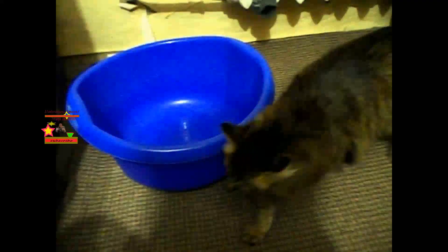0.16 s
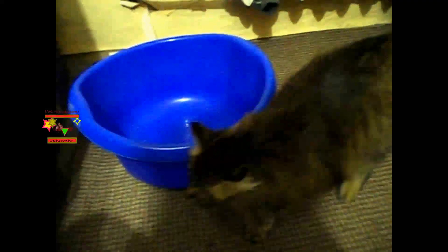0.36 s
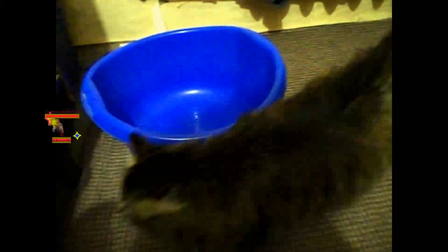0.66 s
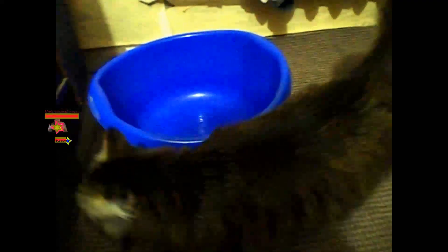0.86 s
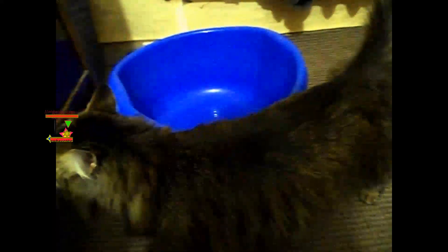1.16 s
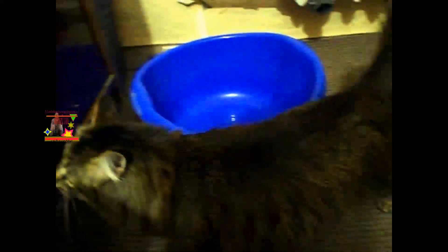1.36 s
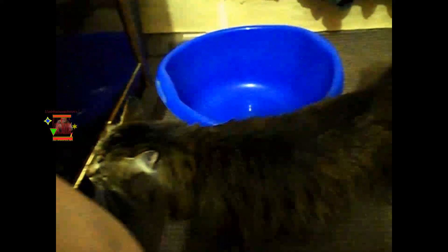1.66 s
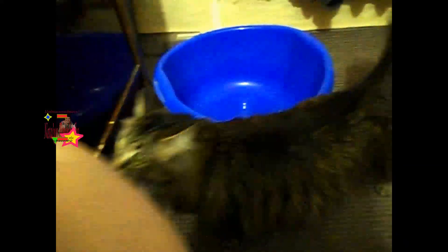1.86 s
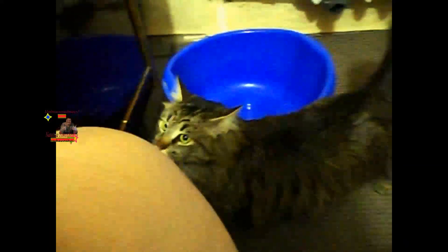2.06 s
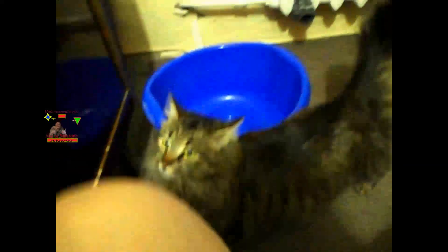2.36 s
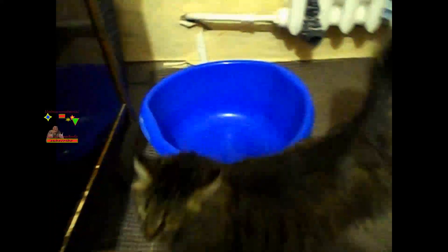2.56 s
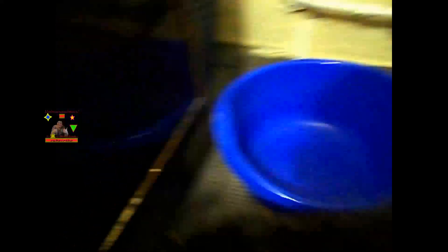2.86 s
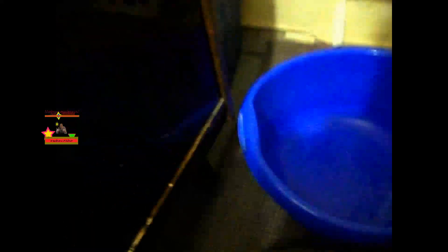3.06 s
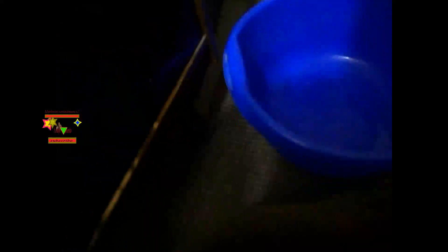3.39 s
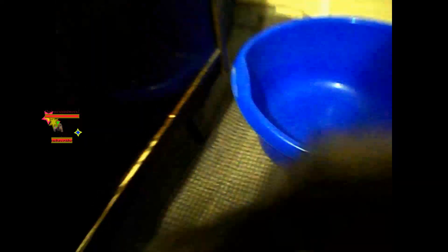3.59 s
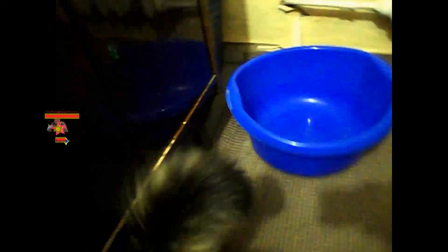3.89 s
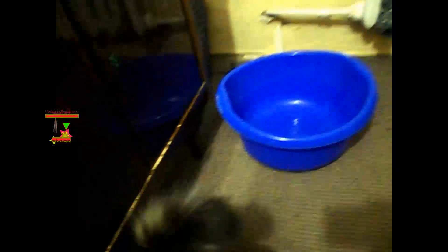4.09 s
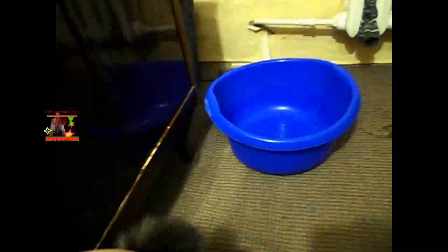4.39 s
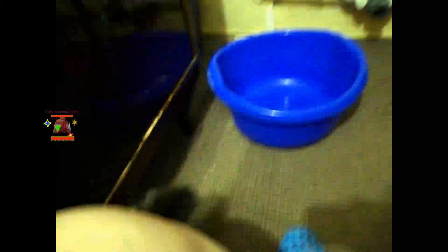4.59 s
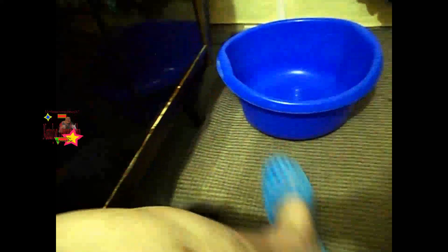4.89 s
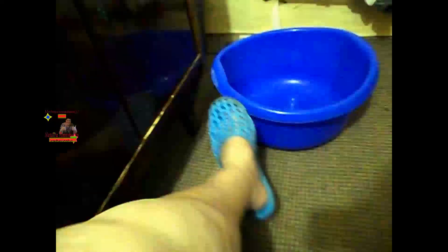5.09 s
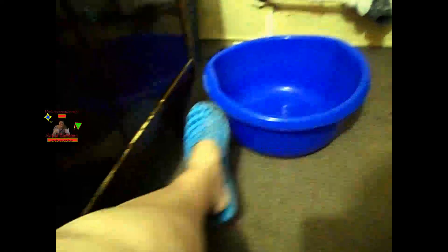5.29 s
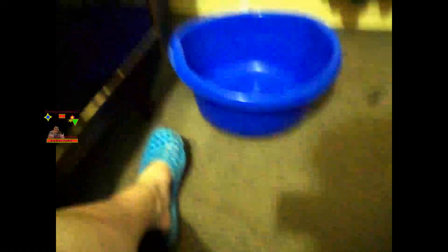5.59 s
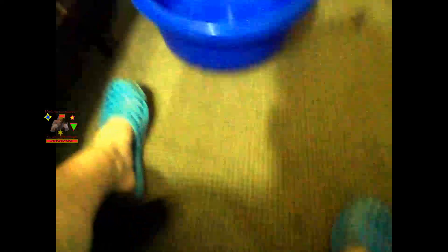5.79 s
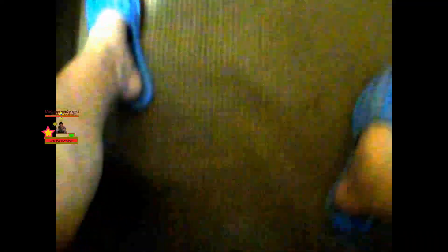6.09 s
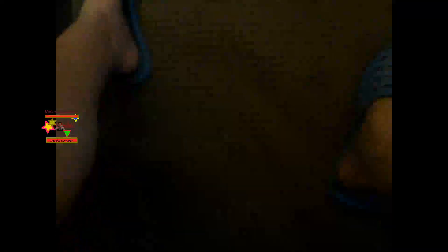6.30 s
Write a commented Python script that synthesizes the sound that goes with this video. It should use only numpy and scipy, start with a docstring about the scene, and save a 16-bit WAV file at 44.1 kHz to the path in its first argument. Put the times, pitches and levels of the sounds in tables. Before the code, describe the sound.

Faint hiss and thin electronic whine, then hand bumps, sharp plastic clicks, one hard knock, and juddering skin scuffs on a small camera case.

```python
"""A steady hiss and a thin electronic whine come first, over the low sway of a hand holding a little camera.
Then the hand shifts its hold: it bumps and brushes the plastic case, and its skin slips and scuffs in judders.
The case snaps in sharp clicks, squeaks briefly under the skin and gives one hard knock.
Hiss, rumble and brushes are coloured noise, the whine is steady tones, slips are rising tones that end in a
tick, and snaps, bumps and the knock are short tones or noise bursts that die away."""
import sys
import numpy as np
from scipy import signal
from scipy.fft import rfft, irfft
from scipy.io import wavfile
from scipy.ndimage import uniform_filter1d

SR = 44100
rng = np.random.default_rng(int(sys.argv[2]) if len(sys.argv) > 2 else 0)


def waveform_to_disk(signal):
    """Save audio, clipped to [-1, 1], as 16-bit WAV at the path in sys.argv[1]."""
    frames = np.transpose(np.atleast_2d(signal))
    scaled = np.clip(frames, -1, 1) * 32767
    samples = np.round(scaled).astype(np.int16)
    wavfile.write(sys.argv[1], SR, samples)


N = 284445
TIME = np.arange(N) / SR


def from_db(db):
    """Turn decibels into a gain."""
    return 10 ** (np.asarray(db) / 20)


def rms_one(x):
    """Scale to unit power."""
    return x / np.sqrt(np.mean(x ** 2) + 1e-20)


def add(out, s, sound):
    """Mix a sound in, starting at s seconds."""
    at = int(np.clip(round(s * SR), 0, N))
    out[at:at + len(sound)] += sound[:N - at]


def level(rows, order, fade_s=0.0115):
    """Gain that follows one dB column of a curve and fades beyond its ends."""
    rows = np.array(rows)
    outside = np.maximum(np.maximum(rows[0, 0] - TIME, TIME - rows[-1, 0]), 0)
    gain = from_db(np.interp(TIME, rows[:, 0], rows[:, order]))
    return gain * np.maximum(1 - outside / fade_s, 0)


def colour(x, points, size=16384):
    """Filter with the given spectrum that never sounds ahead of its input (minimum phase)."""
    hz, db = np.transpose(points)
    bins = np.maximum(np.fft.rfftfreq(size, 1 / SR), 1)
    gain = from_db(np.interp(np.log(bins), np.log(hz), db))
    # folding the cepstrum forward in time gives the minimum phase
    cepstrum = irfft(np.log(gain))
    cepstrum[1:size // 2] *= 2
    cepstrum[size // 2 + 1:] = 0
    response = irfft(np.exp(rfft(cepstrum)))
    return signal.oaconvolve(x, response)[:len(x)]


def noise(points):
    """Coloured noise of unit power."""
    return rms_one(colour(rng.standard_normal(N), points))


def resonate(x, modes):
    """Resonances side by side, each ringing at its own pitch with its own gain."""
    out = 0
    for hz, width, db in modes:
        r = np.exp(-np.pi * width / SR)   # a wider resonance dies away sooner
        zeros = np.array([1, 0, -1]) * (1 - r * r) / 2
        poles = [1, -2 * r * np.cos(2 * np.pi * hz / SR), r * r]
        out = out + from_db(db) * signal.lfilter(zeros, poles, x + 1e-18)
    return out


def with_tail(x, t60, tail_db):
    """Near surfaces add a short diffuse tail, which falls 60 dB in t60 seconds."""
    t = np.arange(SR // 4) / SR
    tail = rng.standard_normal(len(t)) * from_db(-60 * t / t60)
    return x + from_db(tail_db) * signal.oaconvolve(x, tail / np.linalg.norm(tail))[:N]


# The tone of the steady hiss. Each row: frequency in Hz, relative strength in dB.
HISS_COLOUR = [(10, -15), (30, -0.5), (70, -16), (150, -19), (280, -23), (420, -21), (600, -28.5),
               (1200, -30.5), (2000, -34), (4000, -36), (7000, -34.5), (10200, -37.5), (11600, -52),
               (12300, -67.5), (14000, -84)]
HISS_DB = -54.5
# The thin whine of the electronics. Each row: frequency in Hz, level in dB rms.
WHINE_TONES = [(10714, -74.5), (10796, -75.5), (11254, -81), (11336, -80)]
# The tone of the slow hand sway. Each row: frequency in Hz, relative strength in dB.
SWAY_COLOUR = [(3, -8), (9, -3.5), (20, -13), (40, -20), (70, -32), (200, -82.5)]
# How strongly the hand sways. Each row: time in seconds, level in dB before sway_db is added.
SWAY_CURVE = [(0.0, -58), (1.63, -53.5), (1.89, -37.5), (2.51, -55), (2.66, -40), (2.75, -44),
              (3.02, -34.5), (3.57, -46), (3.66, -32), (3.77, -45.5), (5.53, -51.5), (5.64, -42),
              (5.86, -45.5), (6.45, -47)]
# The tone of the grip's rumble. Each row: frequency in Hz, relative strength in dB.
RUMBLE_COLOUR = [(30, -5.5), (55, -3), (85, -2.5), (108, 2), (135, -7.5), (170, -7), (225, -14.5),
                 (320, -12.5), (500, -49.5)]
# How strongly the grip rumbles. Each row: time in seconds, level in dB before rumble_db is added.
RUMBLE_CURVE = [(0.0, -64), (1.72, -61.5), (1.83, -48), (2.08, -60), (2.26, -45.5), (2.33, -61.5),
                (2.43, -40.5), (2.51, -57), (2.89, -43.5), (2.95, -37), (3.56, -53), (3.61, -32.5),
                (3.79, -63.5), (3.83, -39), (3.97, -61), (4.08, -46), (4.63, -62), (4.89, -49), (5.21, -70),
                (5.86, -58), (5.89, -44.5), (6.45, -62)]


def background(sway_db=3.5, rumble_db=-1):
    """Sway and rumble of the hand, steady hiss, and thin whine tones of the electronics."""
    sway = from_db(sway_db) * noise(SWAY_COLOUR) * level(SWAY_CURVE, order=1)
    rumble = from_db(rumble_db) * noise(RUMBLE_COLOUR) * level(RUMBLE_CURVE, order=1)
    whine = np.zeros(N)
    for hz, db in WHINE_TONES:
        turns = hz * TIME + rng.random()
        whine += from_db(db) * np.sqrt(2) * np.sin(2 * np.pi * turns)   # root 2 turns rms into peak
    return sway + rumble + from_db(HISS_DB) * noise(HISS_COLOUR) + whine


# Bumps and brief rubs of the hand.
# Each row: start in seconds, level in dB, centre frequency in Hz, decay time in seconds.
HAND_THUDS = [(.158, -51.5, 704, 0.0097), (.409, -57, 820, .016), (.9, -57.5, 2160, 0.042),
              (1.760, -34, 605, 0.01), (1.845, -27, 42, 0.031), (1.848, -24.5, 705, 0.0062),
              (1.941, -42.5, 665, 0.0177), (2.052, -41, 1010, .008), (2.146, -40.5, 590, 0.044),
              (2.231, -40, 205, 0.0245), (2.402, -29.5, 188, 0.0233), (2.404, -38.5, 740, 0.025),
              (2.766, -37, 2170, .013), (2.892, -35.5, 703, 0.0113), (2.924, -30, 94.1, .046),
              (2.992, -26, 80, .028), (3.06, -36.5, 81, 0.15), (3.602, -30, 81.6, 0.0344),
              (3.703, -40.5, 1380, 0.033), (3.825, -35.5, 130.5, 0.014), (4.031, -37, 149, 0.073),
              (5.553, -43.5, 173.9, .022), (5.678, -31.5, 619, 0.0037), (5.888, -39, 151, 0.04485),
              (6.377, -42, 296, 0.0118)]


def thuds(relative_width=0.7, rise_s=.003):
    """Soft bumps and brief rubs of the hand shake the case in a broad band."""
    out, t = np.zeros(N), np.arange(SR // 3) / SR
    for s, db, hz, decay_s in HAND_THUDS:
        band = [(hz, relative_width * hz, 0)]
        shake = rms_one(resonate(resonate(rng.standard_normal(len(t)), band), band))
        add(out, s, from_db(db) * shake * (1 - np.exp(-t / rise_s)) * np.exp(-t / decay_s))
    return out


# The pressure builds, begins to ease this long before the end, and dies away.
BRUSH_ATTACK_S, BRUSH_RELEASE_S, BRUSH_TAIL_S = .04, 0.014, 0.024


def brush_level(start, length):
    """Pressure of one light brush: it builds evenly, holds, then dies away."""
    pressed = np.clip((TIME - start) / BRUSH_ATTACK_S, 0, 1)
    release = start + length - BRUSH_RELEASE_S
    return pressed * np.exp(-np.maximum(TIME - release, 0) / BRUSH_TAIL_S)


# Light brushes of the skin. Each row: start in seconds, length in seconds, hiss level in dB
# and murmur level in dB, both before brush_db is added.
LIGHT_BRUSHES = [(1.483, 2.6, -59.5, -63), (1.549, 0.053, -56, -58), (1.743, 0.29, -59.5, -58.5),
                 (2.094, 0.1665, -48, -55), (2.36, 0.084, -47, -50.5), (2.444, 0.048, -42.5, -63),
                 (2.545, .16, -46.5, -51), (2.741, 0.0507, -46, -42.5), (2.83, 0.138, -51.5, -49.5),
                 (2.972, 0.3043, -44.5, -43.5), (3.252, .17, -48.5, -48.5), (3.55, 0.12, -54.5, -54),
                 (3.676, 0.072, -44, -40), (3.808, 0.086, -51, -48), (4.43, 0.061, -55, -48.5),
                 (4.515, 0.24, -63, -58), (4.6, 0.068, -57.5, -74), (5.54, 0.15, -59, -63),
                 (5.669, 0.081, -49, -59), (5.755, .11, -45, -51), (6.07, .24, -49.5, -48)]
# The tone of the brushing hiss. Each row: frequency in Hz, relative strength in dB.
BRUSH_COLOUR = [(700, -10), (1200, 0), (2000, -3), (2900, -0.5), (4300, -3.5), (5000, -1), (5600, -2),
                (7000, 2), (9000, -5), (10000, -5), (11000, -20), (12300, -43.5)]
# The dull murmur of the case, also heard in scuffs. Each row: frequency in Hz, relative strength in dB.
BODY_COLOUR = [(120, -13.5), (220, 2.5), (330, 3), (500, -1.5), (800, -3), (1000, -5.5), (1800, -38.5)]
# A short squeak of skin on plastic. Each row: time in seconds, level in dB.
SQUEAK_CURVE = [(2.57, -72), (2.598, -39), (2.624, -40), (2.634, -45.5), (2.684, -43), (2.77, -54.5)]
# What the squeak rings with. Each row: frequency in Hz, width in Hz, gain in dB.
SQUEAK_RINGS = [(987, 29.5, -6.5), (1178, 26, 0), (1250, 82, -17), (1397, 27, -10), (1610, 90, -19)]


def brushes(brush_db=-1, grain_db=2.0):
    """A light touch slides without sticking: a grainy hiss and a dull murmur of the case, plus a squeak."""
    flicker = rms_one(uniform_filter1d(rng.standard_normal(N), size=150))
    grain = rms_one(from_db(grain_db * flicker))
    hiss, body = np.zeros((2, N))
    for start, length, hiss_db, body_db in LIGHT_BRUSHES:
        pressure = brush_level(start, length)
        hiss += from_db(hiss_db) * pressure
        body += from_db(body_db) * pressure
    squeak = rms_one(resonate(rng.standard_normal(N), SQUEAK_RINGS)) * level(SQUEAK_CURVE, order=1)
    return from_db(brush_db) * grain * (hiss * noise(BRUSH_COLOUR) + body * noise(BODY_COLOUR)) + squeak


# A longer slide ends in a harder catch.
CATCH_DB, CATCH_DB_PER_S = -8.5, 1650.5


def slip(slide_s, start_hz=1100, end_hz=7500, zip_db=-1.0, grit_db=-4.5, rough=0.26,
         shove_db=-12, shove_hz=210, catch_s=.0009):
    """Skin lets go and speeds up, so its ridges pass at a rising pitch; then it catches with a tick."""
    t = np.arange(SR // 25) / SR
    slide_s = max(slide_s, .002)
    way = t / slide_s   # 0 at the release, 1 at the catch
    sliding = np.minimum(way, 1)
    catch_db = CATCH_DB + CATCH_DB_PER_S * slide_s
    jitter, grit, tick = rng.standard_normal((3, len(t)))
    pitch = start_hz + (end_hz - start_hz) * sliding ** 1.6
    pitch = pitch * (1 + rough * rms_one(uniform_filter1d(jitter, size=12)))
    swell = np.sqrt(np.maximum(np.sin(np.pi * sliding), 0))
    zipping = np.sin(2 * np.pi * np.cumsum(pitch) / SR) * swell
    grit = grit * np.exp(-((way - .6) / .45) ** 2)   # strongest past the middle of the slide
    tick = np.diff(tick, prepend=0) * np.exp(-np.abs(t - slide_s) / catch_s)
    shove = np.sin(2 * np.pi * shove_hz * t) * np.exp(-way)   # the release jolts the whole case
    skin = from_db(zip_db) * zipping + from_db(grit_db) * grit
    return skin + from_db(catch_db) * tick + from_db(shove_db) * shove


# Level gained from the ends to the hardest moment; time for the skin to bite; time to die away.
SCUFF_SWELL_DB, SCUFF_ATTACK_S, SCUFF_FADE_S = 7, 0.0064, 0.009


def scuff_level(start, hardest, end):
    """The skin bites, pressure builds to the hardest moment, eases and lets go."""
    swell = from_db(np.interp(TIME, [start, hardest, end], [-SCUFF_SWELL_DB, 0, -SCUFF_SWELL_DB]))
    bite = np.clip((TIME - start) / SCUFF_ATTACK_S + 1, 0, 1)   # complete at the start time
    return swell * bite * np.exp(-np.maximum(TIME - end, 0) / SCUFF_FADE_S)


# Every single slip also sounds the hollow of the case, at a level relative to the slip's row.
SLIP_HOLLOW_DB, SLIP_HOLLOW_DECAY_S = -13, .016
# Within runs, faster rubbing shortens each slide and adds smooth hiss: slide time and hiss at the usual rate.
USUAL_SLIPS_PER_S, JUDDER_SLIDE_S, SLIDE_SHORTENS, SLIDING_DB = 99.1, .007, 0.327, -8
# Single slips of the skin, some apart, some close together or at the edge of a run.
# Each row: start in seconds, level in dB before the trims in scuffs(), slide time in seconds.
SINGLE_SLIPS = [(1.585, -33, 0.0089), (1.76, -31, .007), (3.821, -30, 0.0037), (3.985, -39, 0.0097),
                (4.242, -35.5, 0.009), (4.283, -44, 0.013), (4.453, -36, .008), (4.759, -35.5, 0.0087),
                (5.733, -28.5, 0.0094), (5.767, -24.5, 0.0095), (5.793, -26.5, 0.0096), (5.816, -28, .0085),
                (5.886, -28, .0055), (6.123, -29, 0.00443), (6.139, -29, 0.0057), (6.186, -29.5, .005),
                (6.211, -26, 0.0053), (6.238, -27, 0.0061), (6.281, -25.5, 0.00569)]
# Runs of slips. Each row: start, hardest moment and end in seconds, then friction, body and hollow ring
# levels in dB before the trims in scuffs(), then slips per second at the ends and when hardest.
SLIP_RUNS = [(3.853, 3.881, 3.912, -33, -46.5, -50, 184, 179),
             (3.99, 4.071, 4.25, -37, -40.5, -53, 134, 146.4),
             (4.235, 4.254, 4.4, -37.5, -43.5, -52, 73, 91),
             (4.31, 4.418, 4.455, -38, -40, -42.5, 42.5, 42.5),
             (4.76, 4.771, 4.815, -33, -42.5, -37.5, 64, 63), (4.817, 4.845, 4.94, -30, -38, -41, 69.5, 70),
             (4.896, 4.914, 4.937, -29, -45.5, -43, 60, 64),
             (4.951, 4.964, 5.01, -36, -41, -42.5, 30, 32.1), (5.832, 5.848, 5.98, -29.5, -44, -52, 66, 75),
             (5.885, 5.893, 5.95, -25, -40, -55, 95, 100), (5.962, 5.965, 6.09, -31, -39, -40, 76, 100)]
# Resonances of the plastic case. Each row: frequency in Hz, width in Hz, gain in dB.
CASE_RINGS = [(1159, 78, 9.5), (1305, 48, 6), (2040, 200, 2), (2946, 70, 2), (3690, 52, 3.5),
              (5070, 71, 8.5), (5570, 52, 6.5), (6210, 51, 7.5), (6688, 69, 12), (7010, 39, 11),
              (7190, 330, 5), (7900, 30, 7.5), (8270, 85, -2.5), (9775, 220, 0)]
# Resonances of the hollow of the case. Each row: frequency in Hz, width in Hz, relative gain in dB.
HOLLOW_RINGS = [(1132, 41, -8), (1184.8, 37, 3), (1285, 41, -5)]


def scuffs(slip_db=-5, judder_db=-3.5, body_db=3, hollow_db=1.5, throb_s=.016, uneven_db=1.5, timing=.03):
    """Some slips are placed one by one; runs of slips form a ribbed rasp. The case colours both."""
    friction, body, hollow = np.zeros((3, N))
    for s, db, slide_s in SINGLE_SLIPS:
        add(friction, s, from_db(db + slip_db) * slip(slide_s))
        add(hollow, s, from_db(db + SLIP_HOLLOW_DB) * np.exp(-TIME[:SR // 10] / SLIP_HOLLOW_DECAY_S))
    for start, hardest, end, db, murmur_db, ring_db, slow_per_s, fast_per_s in SLIP_RUNS:
        # smooth sliding hiss, with the judder of the slips laid over it
        rasp = from_db(SLIDING_DB) * fast_per_s / USUAL_SLIPS_PER_S * rng.standard_normal(N)
        throb, s = np.zeros(N), start
        while s < end:
            per_s = np.interp(s, [start, hardest, end], [slow_per_s, fast_per_s, slow_per_s])
            per_s = np.clip(per_s, 20, 400)
            slide_s = JUDDER_SLIDE_S * (USUAL_SLIPS_PER_S / per_s) ** SLIDE_SHORTENS
            wait_s = np.exp(timing * rng.normal()) / per_s
            add(rasp, s, from_db(judder_db + uneven_db * rng.normal()) * slip(slide_s))
            add(throb, s, np.exp(-TIME[:int(wait_s * SR)] / throb_s))   # each slip shakes the case anew
            s += wait_s
        pressure = scuff_level(start, hardest, end)
        friction += from_db(db) * pressure * rasp
        body += from_db(murmur_db) * pressure * throb
        hollow += from_db(ring_db) * pressure * throb
    ringing = with_tail(friction + resonate(friction, CASE_RINGS), t60=.035, tail_db=-14)
    hollow *= from_db(hollow_db) * rms_one(resonate(rng.standard_normal(N), HOLLOW_RINGS))
    return ringing + hollow + from_db(body_db) * body * noise(BODY_COLOUR)


SECOND_RING_DB = -6
# The higher a snap rings, the less it moves the shell.
SHELL_DB, SHELL_DB_PER_OCTAVE = 7, -12
# Snaps of the case. Each row: time of the snap in seconds, level in dB, rise time in seconds, decay time
# in seconds, ring in Hz, second ring in Hz, crack level in dB relative to the row's level.
CASE_CLICKS = [(1.851, -10.5, 0.00372, 0.00058, 3560, 2700, -6.5),
               (1.9415, -29, 0.00072, 0.00277, 2750, 5940, -10),
               (2.0537, -7.5, 0.000153, 0.00094, 2770, 4830, -6),
               (2.1076, -15.5, 0.00016, 0.00069, 7700, 10100, -7.5),
               (2.1468, -12.5, 0.000604, 0.00067, 5000, 2900, -3),
               (2.156, -33, 0.0012, 0.0059, 2980, 7800, 2.5),
               (2.1645, -19.5, 0.00033, 0.00119, 6800, 3510, 1),
               (2.6608, -21.5, 0.00016, 0.00043, 7050, 6330, 0),
               (2.892, -38, 0.00049, 0.0058, 3080, 5420, 1.5), (2.9926, -31, 0.0005, 0.0038, 2920, 5000, 4),
               (4.9733, -29, 0.0005, 0.00082, 7660, 1730, 5),
               (4.9934, -26.5, .0001, 0.00068, 8100, 4800, 14),
               (4.999, -43.5, 0.0026, .014, 7220, 1296, 4.5)]


def clicks(shell_hz=950, shell_decay_s=0.0033, blur=0.15):
    """A seam of the case creeps and snaps: two short rings, a crack, and the lower note of the shell."""
    out, t = np.zeros(N), np.arange(-SR // 50, SR // 25) / SR   # the snap is at t = 0
    after = np.maximum(t, 0)
    shell = np.sin(2 * np.pi * shell_hz * after) * np.exp(-after / shell_decay_s)
    for s, db, rise_s, decay_s, hz, second_hz, crack_db in CASE_CLICKS:
        strain = np.exp(-(np.minimum(t, 0) / rise_s) ** 2 - after / decay_s)
        wander = np.cumsum(rng.standard_normal((2, len(t))), axis=1) * blur   # rubbing edges blur the pitch
        first = np.sin(2 * np.pi * hz * t + wander[0])
        second = from_db(SECOND_RING_DB) * np.sin(2 * np.pi * second_hz * t + wander[1])
        crack = from_db(crack_db) * rng.standard_normal(len(t))
        shell_db = SHELL_DB + SHELL_DB_PER_OCTAVE * np.log2(hz / shell_hz)
        add(out, s + t[0], from_db(db) * (strain * (first + second + crack) + from_db(shell_db) * shell))
    return with_tail(out, t60=0.042, tail_db=-18.5)


KNOCK_S, KNOCK_DB, KNOCK_DECAY_S = 3.6032, -13, 0.0031
# What the one sharp knock rings with. Each row: frequency in Hz, width in Hz, gain in dB.
KNOCK_RINGS = [(1870, 230, 4), (2900, 285, 7.5), (4010, 160, 8), (6960, 540, 6), (7600, 200, -8),
               (9300, 400, -3)]


def knock():
    """A loose part snaps home and rattles for a few milliseconds: a noise burst that rings."""
    out, t = np.zeros(N), np.arange(SR // 10) / SR
    add(out, KNOCK_S, from_db(KNOCK_DB) * rng.standard_normal(len(t)) * np.exp(-t / KNOCK_DECAY_S))
    return with_tail(out + resonate(out, KNOCK_RINGS), t60=.11, tail_db=-8.5)


# How the small microphone inside the case colours slips, scuffs, clicks and the knock.
# Each row: frequency in Hz, gain in dB.
MICROPHONE_COLOUR = [(100, 1), (700, -3), (1500, -2.5), (4000, -1.5), (8000, 2), (10000, -2.5),
                     (10800, -9.5), (11300, -17.5), (12500, -28.5)]


def scene():
    contacts = colour(scuffs() + clicks() + knock(), MICROPHONE_COLOUR)
    return (background() + thuds() + brushes() + contacts)[None, :]


CUTOFF_HZ = 12888   # from here up, everything is at least 50 dB down


def record(dry):
    """The top is cut steeply."""
    low_pass = signal.cheby2(18, 50, CUTOFF_HZ, fs=SR, output="sos")
    return signal.sosfilt(low_pass, dry)


dry = scene()
out = record(dry)
waveform_to_disk(out)
```